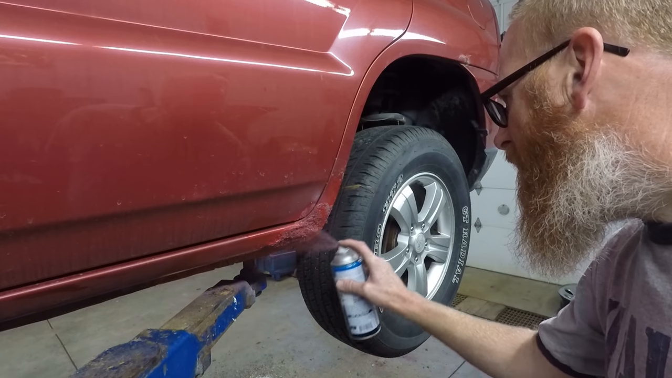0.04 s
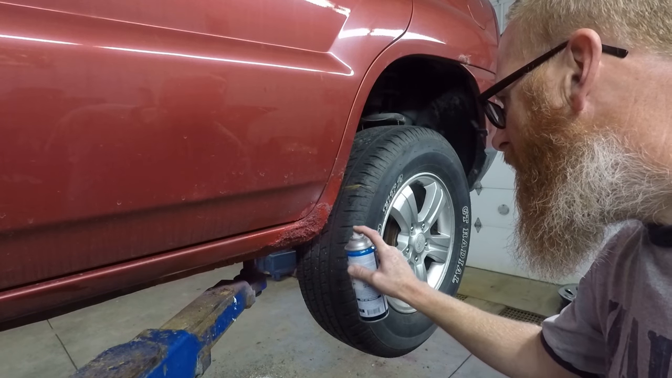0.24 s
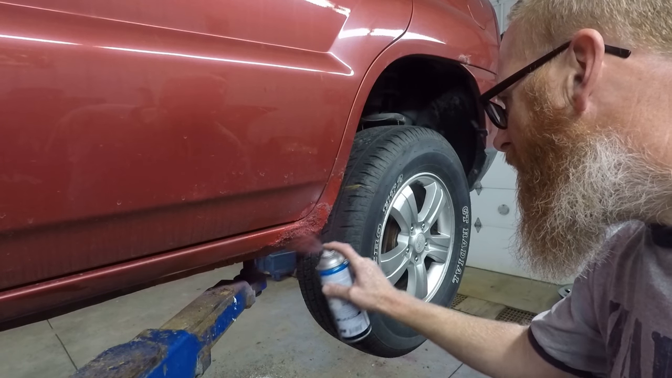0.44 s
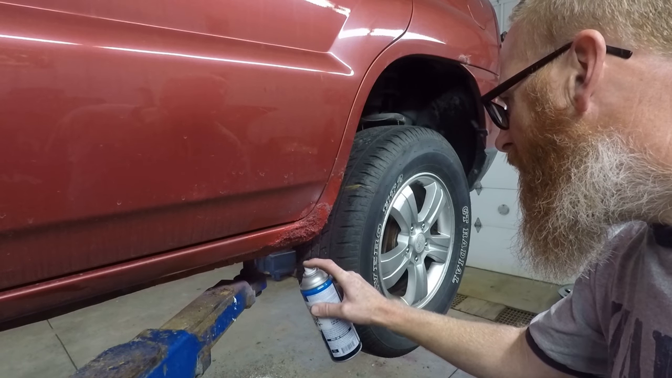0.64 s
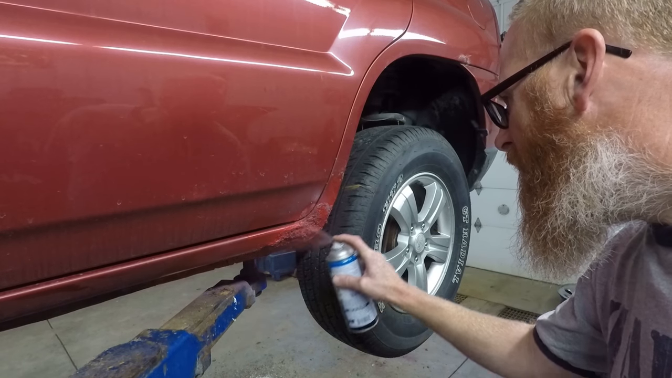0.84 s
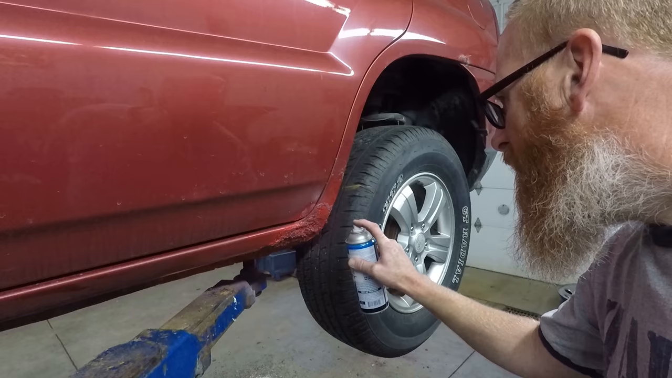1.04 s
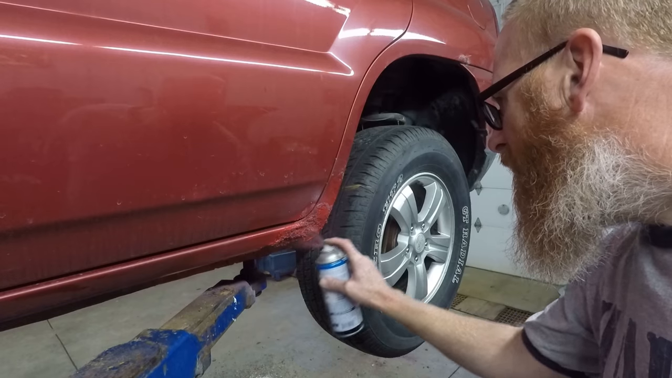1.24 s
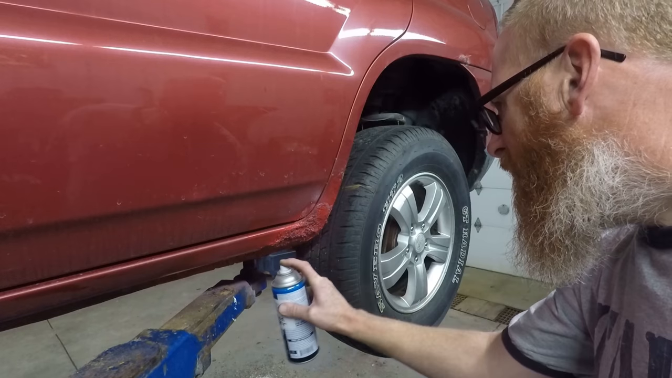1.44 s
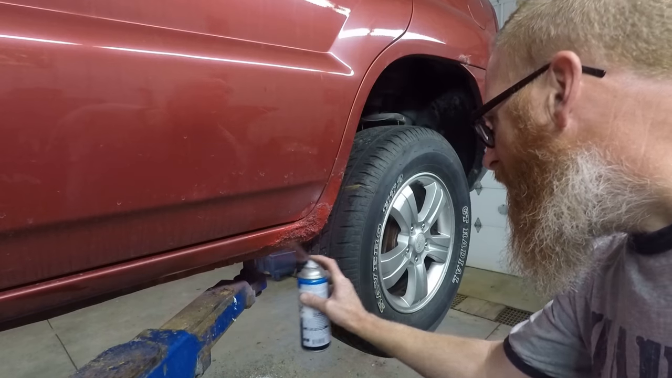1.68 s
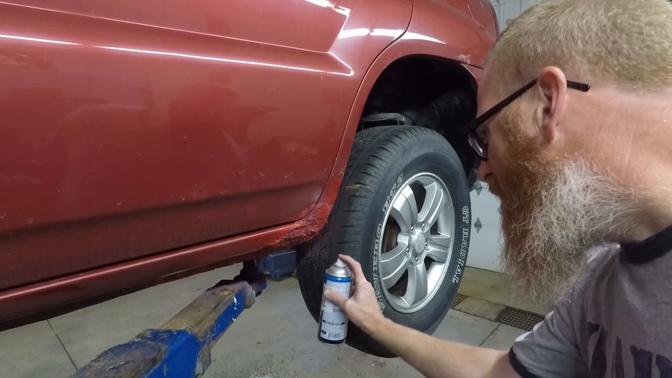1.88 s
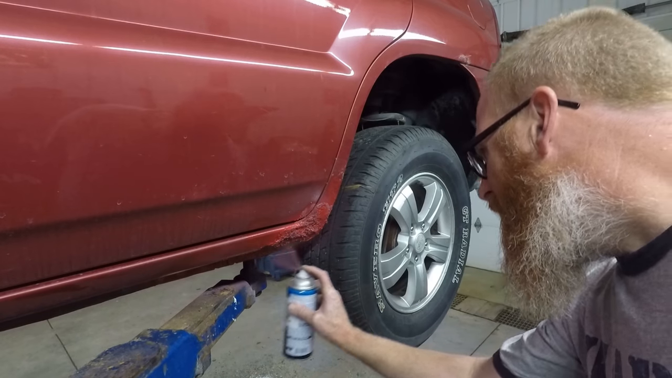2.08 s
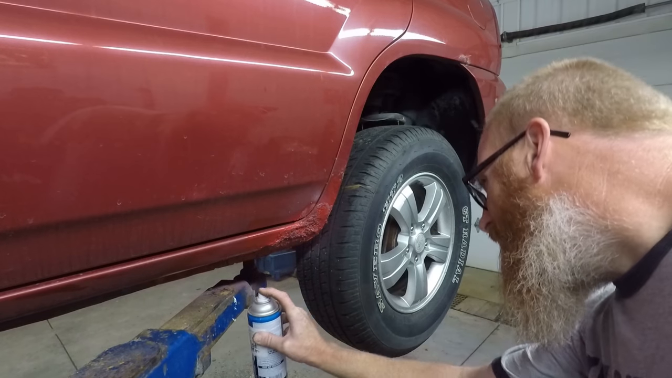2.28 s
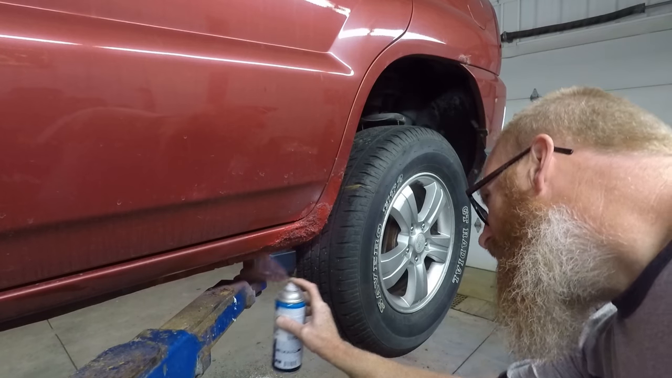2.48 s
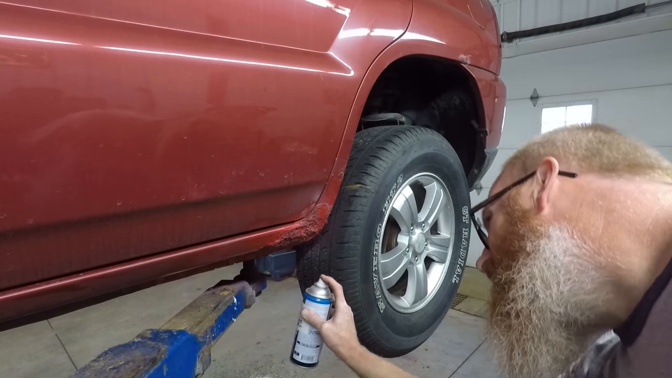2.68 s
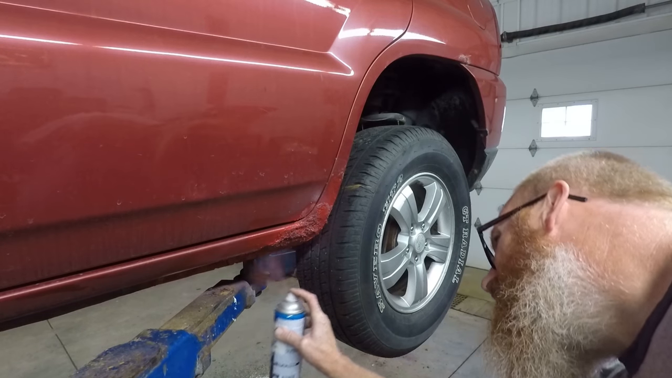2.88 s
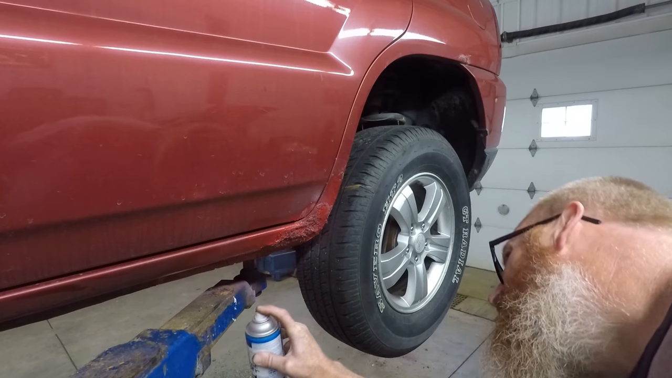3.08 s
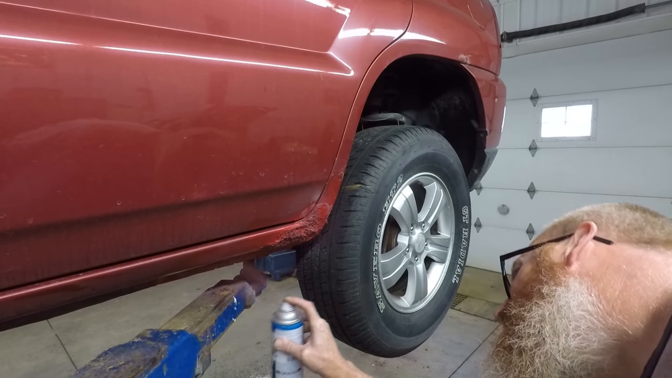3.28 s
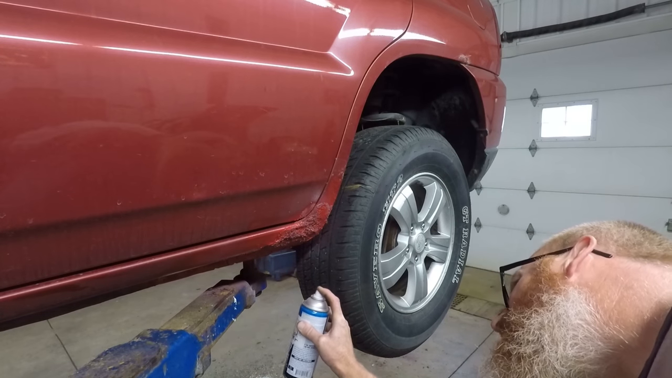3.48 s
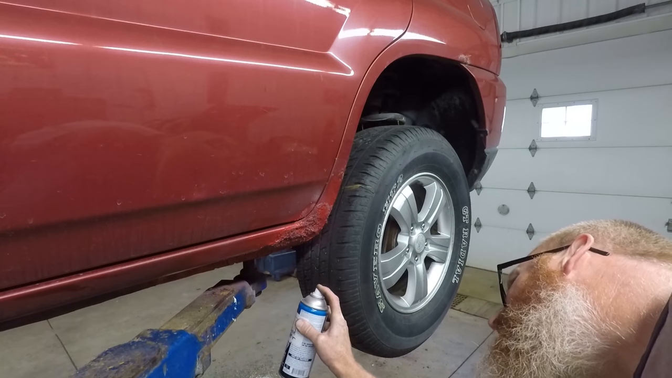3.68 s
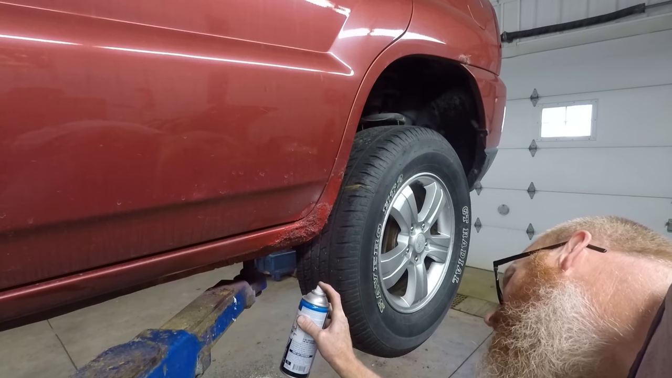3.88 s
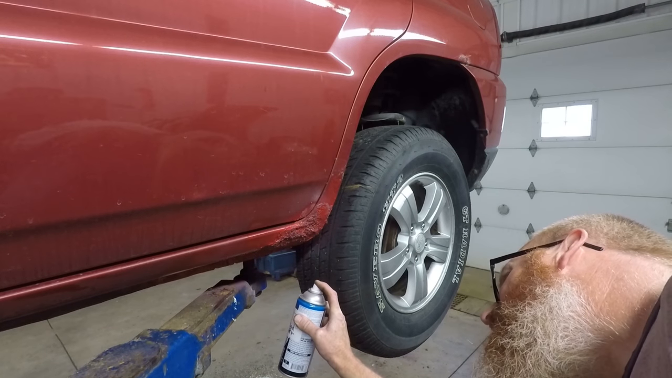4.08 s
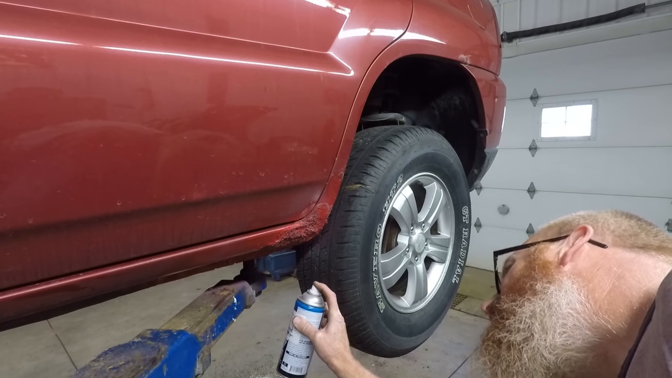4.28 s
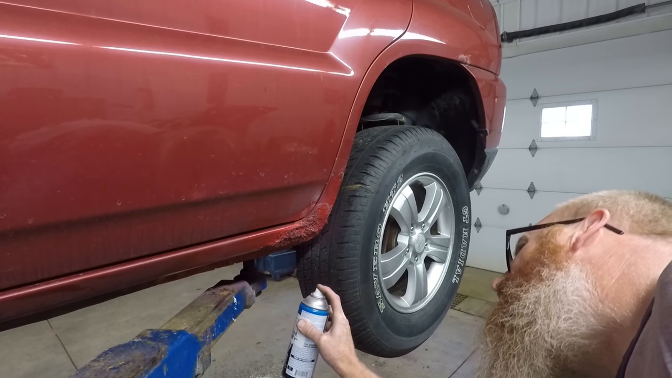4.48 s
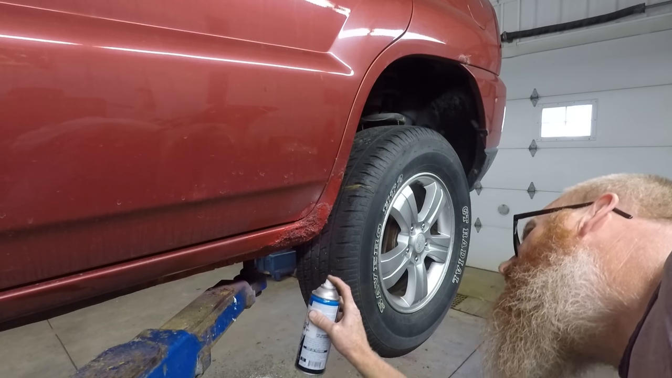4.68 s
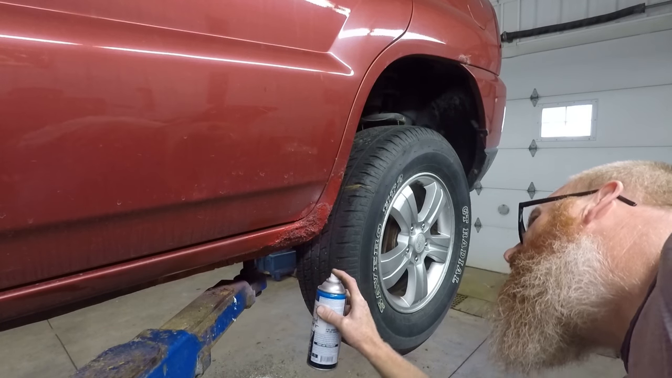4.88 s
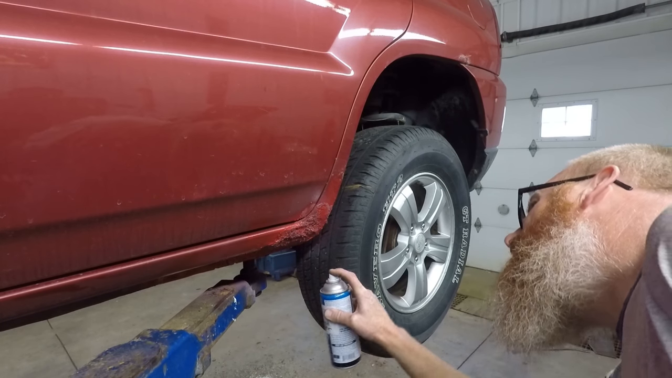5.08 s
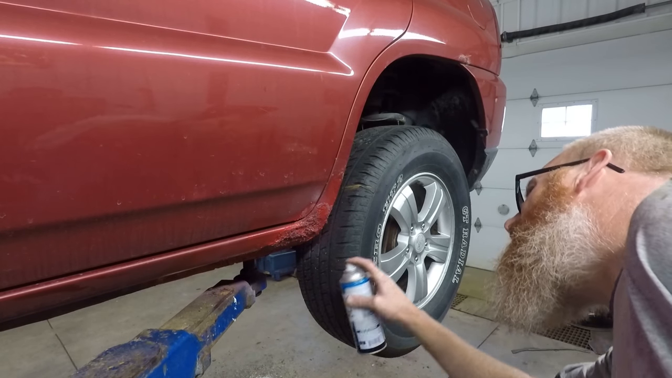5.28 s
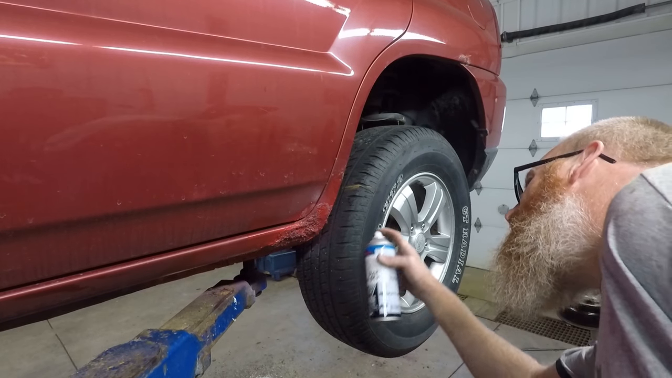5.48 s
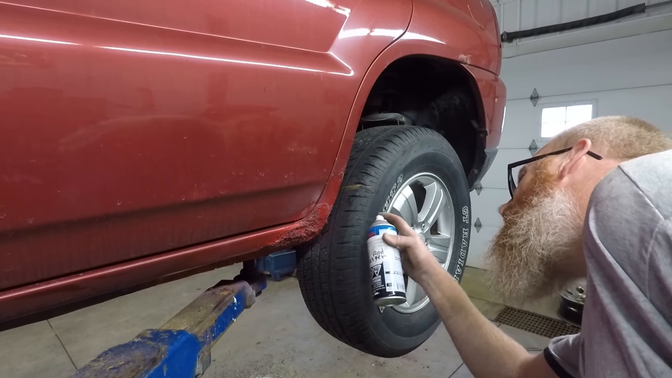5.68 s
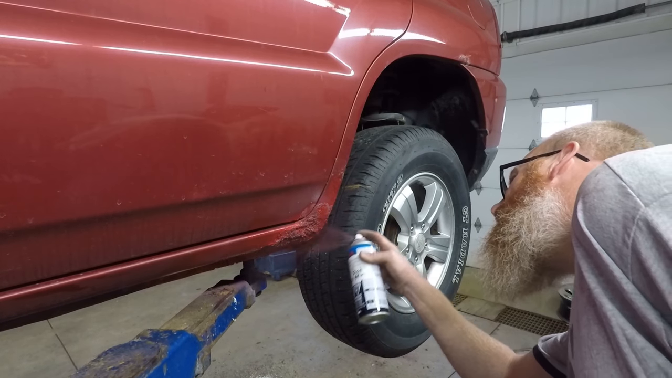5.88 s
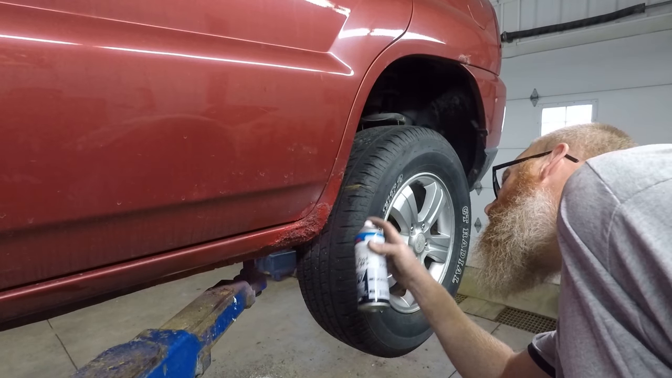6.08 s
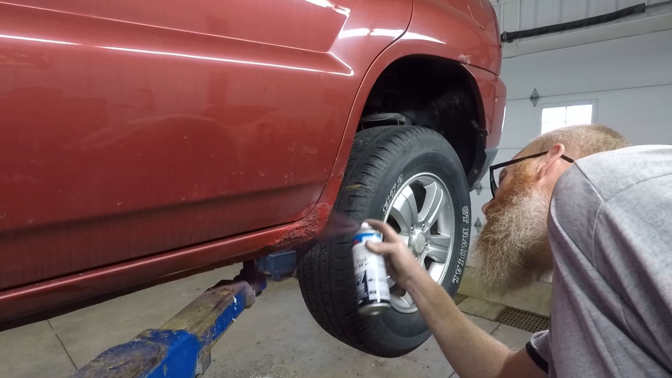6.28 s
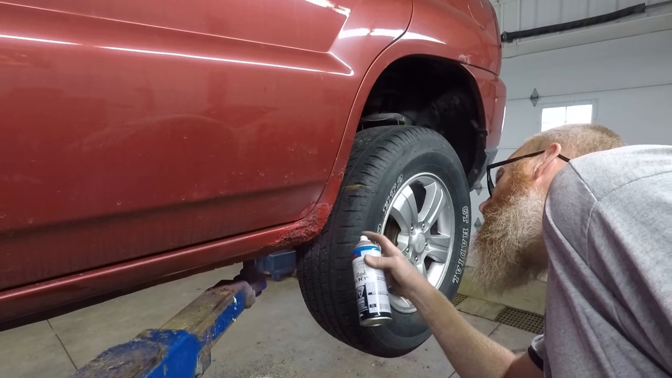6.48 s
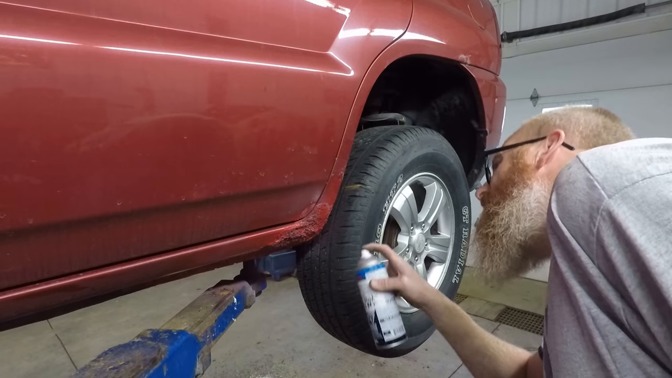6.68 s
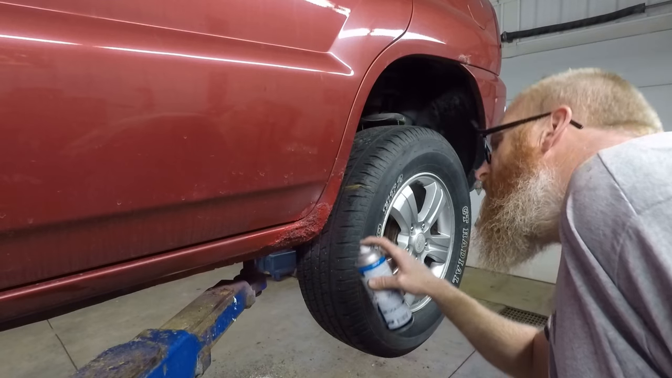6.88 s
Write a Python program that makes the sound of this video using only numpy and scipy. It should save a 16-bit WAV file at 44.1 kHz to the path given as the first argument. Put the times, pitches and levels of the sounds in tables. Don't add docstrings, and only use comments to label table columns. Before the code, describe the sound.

Close by, a spray can fires nine crisp hisses of about a quarter second each, with slightly shorter gaps between, many starting with a dull puff of air. The hard garage rings briefly after each. Spraying then stops for over two seconds, leaving soft room noise, a faint low engine hum and tiny ticks. Two more bursts follow, the first strongest at its onset, then a sharper click and a light sleeve rustle. One microphone, practically mono.

```python
import sys
import numpy as np
from scipy import signal
from scipy.fft import rfft, irfft, next_fast_len
from scipy.io import wavfile
from scipy.ndimage import uniform_filter1d, map_coordinates

SR = 44100
rng = np.random.default_rng(int(sys.argv[2]) if len(sys.argv) > 2 else 0)


def linear_from_db(decibels):
    return 10 ** (np.asarray(decibels, float) / 20)


def wrap_up_sound(samples):
    columns = np.atleast_2d(samples).T
    tamed = np.clip(columns, -1, 1)
    steps = np.round(tamed * 32767).astype(np.int16)
    wavfile.write(sys.argv[1], SR, steps)


N = 306054
TIME = np.arange(N) / SR

# [f/Hz, density/dB per Hz]
AIR_SPECTRUM = [(140, -11), (230, -2.5), (265, -17.5), (397, -6.5), (465, -4), (545, -6), (803, -6.5),
                (862, -7), (1900, -10.5), (3410, -9), (5780, -15.5), (9980, -15.5), (15500, -21)]
# [f/Hz, density/dB per Hz]
RUMBLE_SPECTRUM = [(15, -16), (40, -2), (52, -2), (70, -9), (150, -7), (230, -15), (400, -18), (600, -120)]
# [t/s, peak level/dB, half length/s]
PASSING_VEHICLES = [
    (1.95, -62, 0.91),
    (3.7, -65, 0.97),
    (5.78, -64.5, 0.098),
    (6.42, -71, 0.11),
]
# [f/Hz, t60/s]
GARAGE_T60 = [(250, 0.34), (1200, 1), (2300, 0.7), (4400, 0.86), (7000, 0.77), (10000, 0.51), (14000, 0.24)]
STRONG_ORDERS = (5, 8, 11)
# [order, t/s, peak level/dB, half length/s]
ENGINE_SWELLS = [(5, 0.52, -58.5, .7), (5, 1.35, -59.5, 0.8), (5, 2.65, -57, .25), (5, 3.07, -53, 0.098),
                 (5, 3.4, -57, .13), (5, 3.74, -58, 0.11), (5, 4.08, -59.5, 0.09), (5, 4.84, -56, 0.27),
                 (5, 6.23, -59.5, 0.47), (5, 7.04, -58, 0.38), (8, 0.11, -68, 0.34), (8, 1.12, -67, 0.18),
                 (8, 3.7, -67, .15), (8, 1.705, -54, 0.27), (8, 2.48, -56.5, .28), (8, 3.17, -62, 0.5),
                 (8, 4.31, -54, 0.25), (8, 4.66, -58, 0.45), (8, 5.46, -63.5, 0.25), (8, 6.38, -57.5, 0.35),
                 (8, 6.85, -54.5, 0.27), (11, 1.5, -80, 0.43), (11, 2.3, -64, 0.45), (11, 3, -64.5, 0.17),
                 (11, 3.47, -61.5, 0.33), (11, 4.12, -67, 0.45), (11, 5.53, -64.5, 0.28), (11, 6, -75, .5)]
# [order, level/dB]
WEAK_ORDERS = [(4, -86.5), (7, -80), (9, -82.5), (10, -83.5), (12, -96), (15, -91), (16, -82)]
# [t/s, peak level/dB, half length/s]
ARM_MOVES = [
    (3.8, -78, .35),
    (6.94, -64.5, 0.18),
]
# [f/Hz, density/dB per Hz]
CLOTH_SPECTRUM = [(200, -38), (500, -6), (1500, -8.5), (3500, -2.5), (5500, -11), (12000, -20)]
# [t/s, ring level/dB, ring f/Hz, ring t60/s, crack level/dB]
IMPACTS = [(2.7155, -52, 1500, .03, -52), (3.1887, -51, 3150, .03, -65), (4.3725, -49, 9200, .004, -53),
           (4.4660, -48, 3400, .003, -46), (4.6628, -50, 10400, .004, -57), (5.3105, -48, 9500, .004, -53),
           (6.5709, -36, 3600, .004, -48), (6.5775, -46, 4500, .003, -58), (6.7195, -49, 4050, .007, -56),
           (6.7975, -48, 3300, .006, -58), (6.808, -55, 700, .02, -70)]
# [t/s, peak level/dB, centre f/Hz]
PUFFS = [(0.368, -45, 315), (0.79, -49, 426), (1.178, -42, 440), (1.626, -42.5, 556), (2.02, -39.5, 450),
         (2.408, -42.5, 454), (2.76, -40, 490), (3.217, -46, 468), (3.422, -47, 576), (5.767, -37.5, 516),
         (5.916, -40.5, 1270), (6.223, -50, 436)]
# [f/Hz, density/dB per Hz]
JET_SPECTRUM = [(94, -50), (160, -23.5), (194, -7.5), (230, -16), (450, -6.5), (798, -11.5), (862, -9),
                (1390, -10), (2330, -2), (2570, -4.5), (4380, -1.5), (5730, -7.5), (7490, -6), (11400, -1),
                (15500, -13.5)]
# [f/Hz, width/Hz,
# lift/dB]
JET_LIFTS = [(2304, 220, 5), (3750, 130, 2.5), (4380, 390, 1.5), (15400, 1900, 9)]
# [valve opens t/s, valve shuts t/s, hiss level at start/dB, at end/dB, press time/ms]
STROKES = [(-.05, 0.192, -42, -43.5, 2), (.356, 0.597, -42, -42.5, 3.5), (0.782, 1.014, -42.5, -42, 6.5),
           (1.169, 1.428, -42, -42.5, 2.5), (1.616, 1.834, -44, -44.5, 5), (2.019, 2.233, -43.5, -45.5, 4),
           (2.394, 2.59, -45.5, -44.5, 1.8), (2.757, 3.07, -45.5, -44.5, 2.3),
           (3.212, 3.441, -44, -45.5, 1.8), (5.73, 5.942, -40, -47.5, 9.7), (6.214, 6.403, -43, -45.5, 3.4)]
ECHO_PATHS = [(13.3, 12.1, .43, 19.7, 16.8), (11.3, 13.3, .4, 18.4, 22.1), (13.6, 10.6, .42, 9.8, 11),
              (9.4, 9.4, .65, 11.2, 18.6), (7.76, 7.34, .31, 10.4, 10.9), (6.3, 7.5, .21, 23.3, 26.2),
              (7.76, 6.9, .3, 13.3, 14.5), (10, 11.2, .2, 6.9, 11.9), (12.5, 10.4, .23, 8, 7.5),
              (13.7, 10.4, .3, 10.3, 7.8), (9.6, 8.4, .42, 6.5, 6.1)]
# [aim at microphone at start/dB, at end/dB,
# can ring left by the grip at start/dB, at end/dB, throat level/dB]
JET_AIM = [(-3, -2.5, -12.5, -7.5, -7), (-5, -1.5, -5.5, -10, -11), (-2, -2.5, -7.5, -9, -10),
           (-6, 0, -10, -14.5, -10.5), (1, 0, -3, -16, -11), (-0.5, -1, -11, -6.5, -14),
           (1.5, -1, -5.5, -6.5, -13), (-0.5, -3.5, -11.5, -5.5, -9), (-1.5, -4.5, -10, -6.5, -10),
           (-7.5, 2, -15, -13, -12.5), (-4, -1, -15, -12, -11.5)]
ARCH_CM = (23, 29, 35, 42, 51)


def unit(x):
    return x / np.sqrt(np.mean(x ** 2) + 1e-20)


def along(points, hz):
    f, v = np.transpose(points)
    return np.interp(np.log(hz + 1), np.log(f + 1), v)


def wobble(rate):
    return map_coordinates(rng.standard_normal(int(N * rate / SR) + 4), [TIME * rate])


def filtered(x, response):
    m = next_fast_len(N + 8192)
    return irfft(rfft(x, m) * response(np.fft.rfftfreq(m, 1 / SR)), m)[..., :N]


def patchy(patchy_db):
    z = signal.stft(rng.standard_normal(N), nperseg=256)[2]
    field = uniform_filter1d(rng.standard_normal(z.shape), 3, 0)
    field = uniform_filter1d(field, 12, 1)
    return signal.istft(z * linear_from_db(patchy_db * unit(field)), nperseg=256)[1][:N]


def swells(rows, floor_db):
    power = linear_from_db(2 * floor_db)
    for s, db, half in rows:
        power = power + linear_from_db(2 * db) * 4. ** -((TIME - s) / half) ** 2
    return np.sqrt(power)


def steady_air():
    def colour(hz):
        port_db = 3 / (1 + ((hz - 10100) / 700) ** 2)
        return linear_from_db(along(AIR_SPECTRUM, hz) + port_db)

    return linear_from_db(-66.0) * unit(filtered(patchy(patchy_db=-0.5), colour))


def traffic():
    rumble = unit(filtered(rng.standard_normal(N), lambda hz: linear_from_db(along(RUMBLE_SPECTRUM, hz))))
    return swells(PASSING_VEHICLES, floor_db=-69.5) * linear_from_db(2.0 + wobble(2.84)) * rumble


def garage(x):
    hz, t, z = signal.stft(rng.standard_normal(SR), SR, nperseg=256)
    decay = linear_from_db(-60 * t / along(GARAGE_T60, hz)[:, None])
    tail = signal.istft(z * decay, SR, nperseg=256)[1]
    delayed = np.pad(x, (300, 0))
    return signal.fftconvolve(delayed, tail / np.linalg.norm(tail))[:N]


def engine():
    idle_hz, above_idle_hz, settle_s, settle_shape = 11.36, 1.64, 2.7, 1.5
    shaft_hz = idle_hz + above_idle_hz * np.exp(-(TIME / settle_s) ** settle_shape)
    turn = 2 * np.pi * np.cumsum(shaft_hz) / SR
    out = np.zeros(N)
    for order in STRONG_ORDERS:
        rows = [row[1:] for row in ENGINE_SWELLS if round(row[0]) == order]
        level = swells(rows, floor_db=-86.5) * linear_from_db(0.34 * wobble(22))
        out += np.sqrt(2) * level * np.sin(order * turn + .5 * wobble(8))
    for order, db in WEAK_ORDERS:
        level = linear_from_db(db + 4.2 * wobble(2.37))
        out += np.sqrt(2) * level * np.sin(order * turn + wobble(3.3))
    return out


def sleeve():
    lumps = rng.standard_normal(N) * linear_from_db(1.5 * wobble(40))
    rustle = unit(filtered(lumps, lambda hz: linear_from_db(along(CLOTH_SPECTRUM, hz))))
    return swells(ARM_MOVES, floor_db=-92) * rustle


def ticks():
    out, t = np.zeros(N), np.arange(2000) / SR
    for s, ring_db, hz, t60, crack_db in IMPACTS:
        burst = signal.lfilter([1, 0, -1], 1, rng.choice([-1., 1.], len(t)))
        crack = linear_from_db(crack_db - 60 * t / 0.0018) * burst
        ring = linear_from_db(ring_db - 60 * t / max(t60, .001)) * np.sin(2 * np.pi * hz * t)
        out[round(s * SR):][:len(t)] += ring + crack
    return out


def puffs():
    out, t = np.zeros(N), np.arange(6000) / SR
    u = t / 0.02 * 3
    for s, db, hz in PUFFS:
        gust = signal.lfilter(*signal.iirpeak(hz, 1.8, SR), rng.standard_normal(len(t)))
        out[round(s * SR):][:len(t)] += linear_from_db(db - 9.5) * unit(gust) * u * np.exp(1 - u)
    return out


def jet_colour(hz):
    lift = sum(db / (1 + (2 * (hz - c) / w) ** 2) for c, w, db in JET_LIFTS)
    return linear_from_db(along(JET_SPECTRUM, hz) + lift)


def jet_regions():
    droplets = (rng.random(N) < 500 / SR) * rng.standard_normal(N)
    droplets = unit(droplets + .6 * np.roll(droplets, 1))
    flow = patchy(patchy_db=2.0) * linear_from_db(1.03 * wobble(300) + 0.56 * wobble(40))

    def below(hz, edge_hz):
        return 1 / (1 + (hz / edge_hz) ** 12)

    def region(low_hz, high_hz, spit):
        def response(hz):
            return jet_colour(hz) * (below(hz, high_hz) - below(hz, low_hz))
        return unit(filtered(flow + spit * droplets, response))

    splash, ring = region(20, 1900, .1), region(1900, 2800, .1)
    throat, body = region(2800, 3700, .1), region(3700, 6000, .12)
    hiss = region(6000, 20000, .27)
    return splash, ring, throat, body, hiss


def valve_gain(t, way, opens, shuts, db0, db1, rise_ms):
    fall_ms = 2.6 + 0.84 * rise_ms
    surge_db = 5 - 0.37 * rise_ms
    leak = 0.091 / (1 + np.exp((opens - .013 - t) / 0.00083))
    opening = 1 / (1 + np.exp((opens - t) * 1e3 / rise_ms))
    valve = (leak + opening) / (1 + np.exp((t - shuts) * 1e3 / fall_ms))
    surge = np.exp(-np.abs(t - opens - .014) / 0.0092)
    droop = np.exp(np.minimum(t - shuts, 0) / 0.021)
    return valve * linear_from_db(db0 + (db1 - db0) * way + surge_db * surge - 1.5 * droop)


def echoes(beamed, way, panel0, panel1, panel_share, floor0, floor1):
    sound_cm_s, floor_share, arch_share = 34300, .21, .13
    paths = [(panel0, panel1, panel_share), (floor0, floor1, floor_share)]
    slide = np.clip(panel1 / panel0, .8, 1.25) ** .5
    for cm in ARCH_CM * rng.uniform(.9, 1.1, len(ARCH_CM)):
        paths.append((cm / slide, cm * slide, arch_share))
    out = np.zeros(len(beamed))
    for cm0, cm1, share in paths:
        lag = SR * (cm0 + (cm1 - cm0) * way) / sound_cm_s
        echo = map_coordinates(beamed, [np.arange(len(beamed)) - lag], order=3)
        out += min(share, 1 / 1.4) * echo
    return out


def spray():
    splash, ring, throat, body, hiss = jet_regions()
    direct, near_walls = np.zeros((2, N))
    for stroke, path, aim in zip(STROKES, ECHO_PATHS, JET_AIM):
        opens, shuts, db0, db1, rise_ms = stroke
        aim0, aim1, ring0, ring1, throat_db = aim
        part = slice(max(0, int(opens * SR) - 3000), int(shuts * SR) + 4000)
        t = TIME[part]
        way = np.clip((t - opens) / (shuts - opens), 0, 1)
        gain = valve_gain(t, way, opens, shuts, db0, db1, rise_ms)
        aim_db = aim0 + (aim1 - aim0) * way
        ring_db = ring0 + (ring1 - ring0) * way
        splash_db = -12.5 + 0.38 * aim_db
        low = 0.74 * linear_from_db(aim_db) * body[part] + linear_from_db(throat_db) * throat[part]
        low = low * np.clip((t - opens + 0.026) / .008, 0, 1)
        low = low + linear_from_db(ring_db) * ring[part] + linear_from_db(splash_db) * splash[part]
        direct[part] += gain * (low + hiss[part])
        beamed = gain * (1.45 * hiss[part] + .4 * low)
        near_walls[part] += echoes(beamed, way, *path)
    return linear_from_db(-0.22) * direct, linear_from_db(-4.5) * near_walls


def scene():
    jet, near_walls = spray()
    near = jet + puffs() + ticks()
    room = linear_from_db(-10.5) * garage(near)
    mono = near + near_walls + room + sleeve() + engine() + steady_air() + traffic()
    trace = linear_from_db(-44.0) * mono * wobble(400)
    return np.array([mono + trace, mono - trace])


def top_cut(x):
    return signal.sosfilt(signal.butter(12, 16590, fs=SR, output="sos"), x)


def record(dry):
    mix = filtered(dry, lambda hz: 1 / (1 + (hz / 15330) ** 400))
    return top_cut(mix)


dry = scene()
out = record(dry)
wrap_up_sound(out)
```